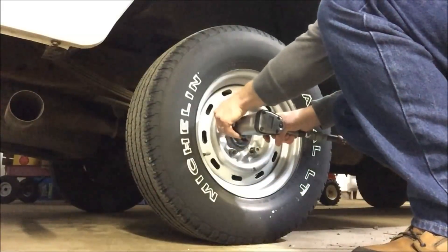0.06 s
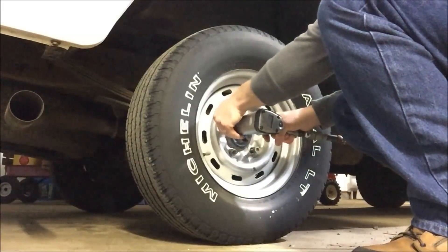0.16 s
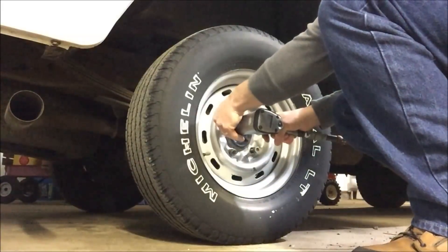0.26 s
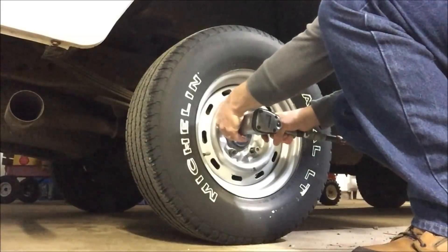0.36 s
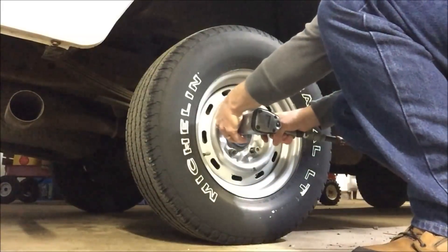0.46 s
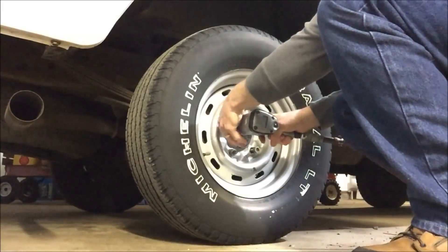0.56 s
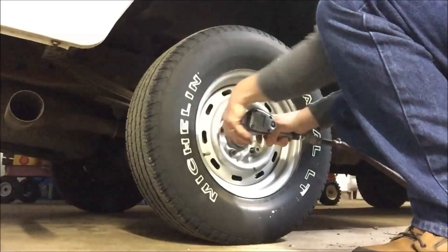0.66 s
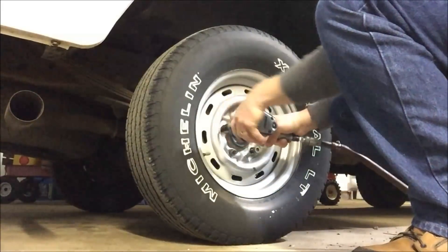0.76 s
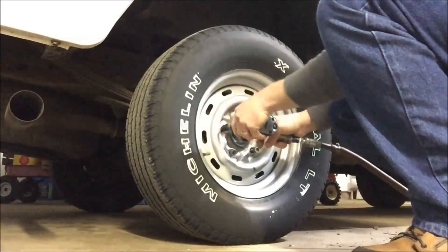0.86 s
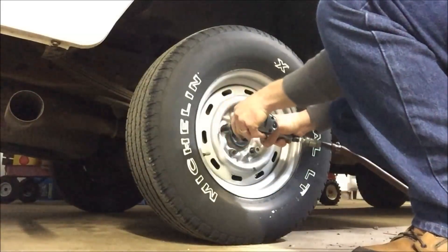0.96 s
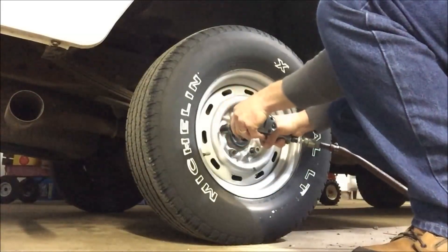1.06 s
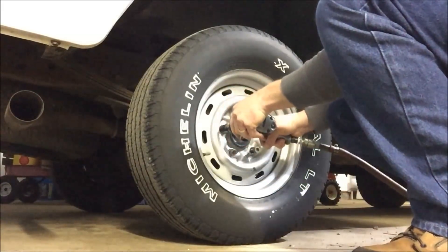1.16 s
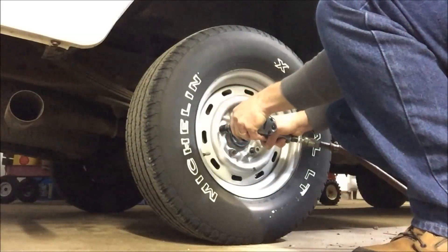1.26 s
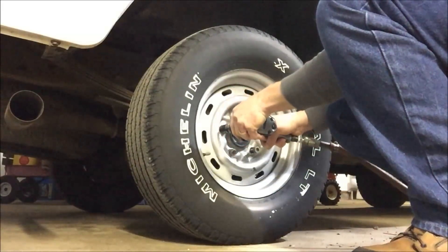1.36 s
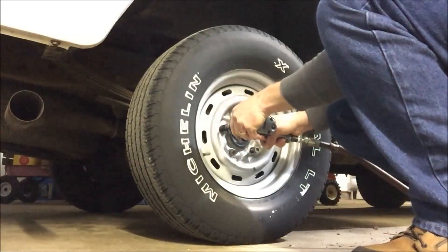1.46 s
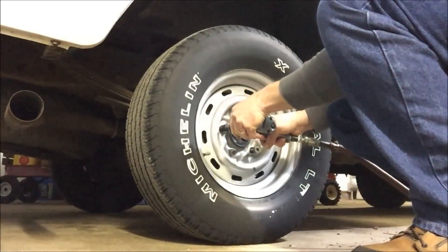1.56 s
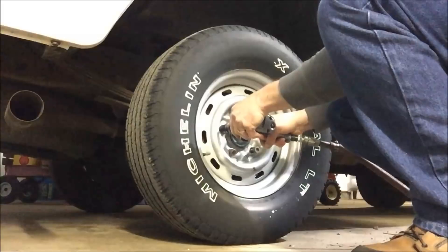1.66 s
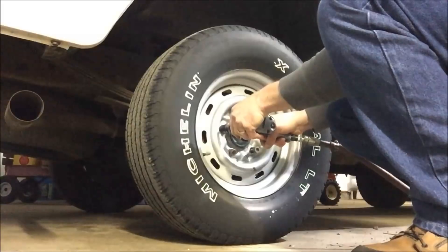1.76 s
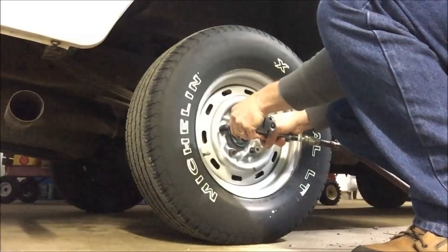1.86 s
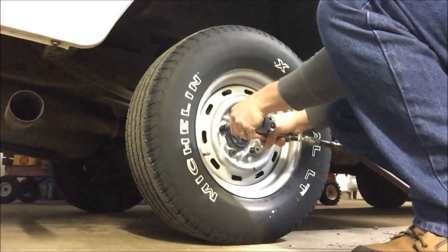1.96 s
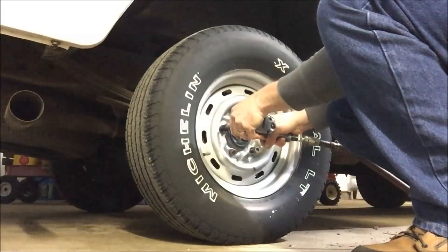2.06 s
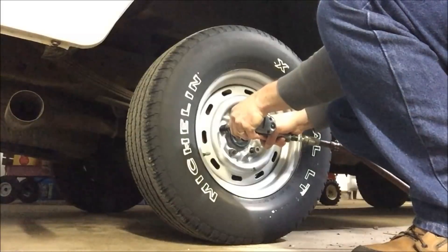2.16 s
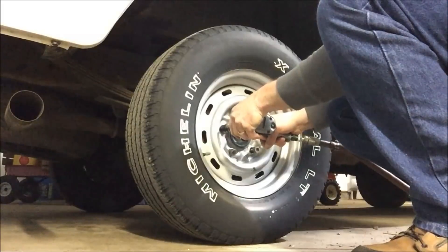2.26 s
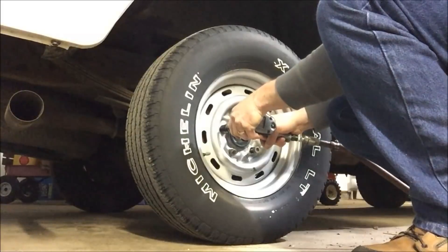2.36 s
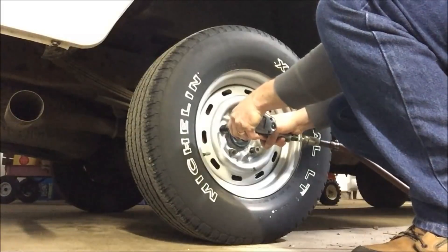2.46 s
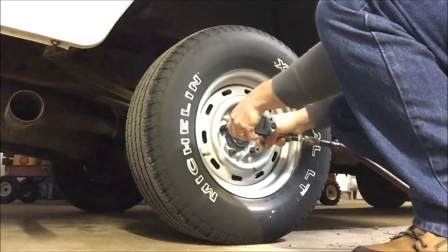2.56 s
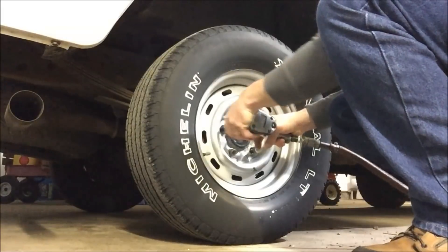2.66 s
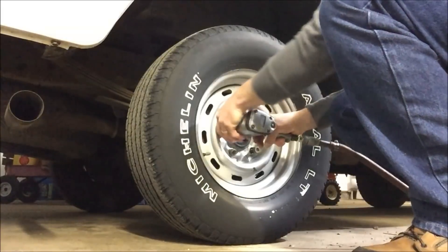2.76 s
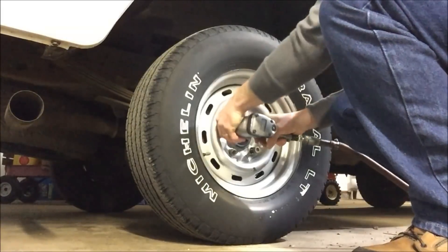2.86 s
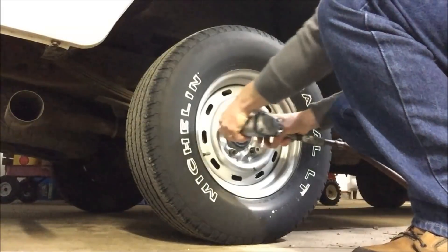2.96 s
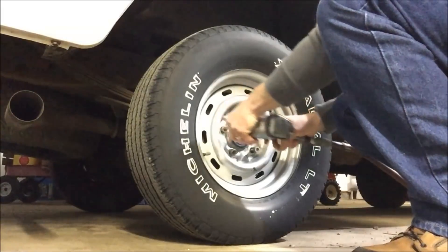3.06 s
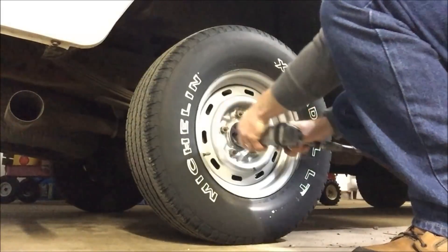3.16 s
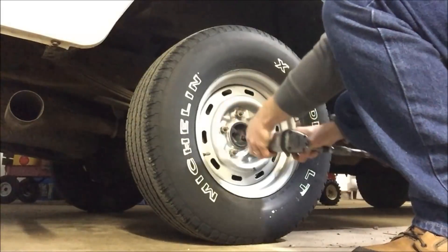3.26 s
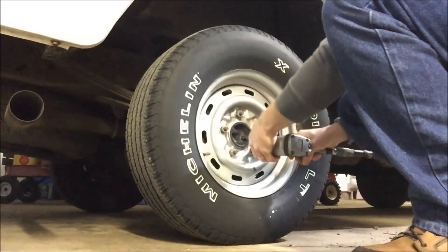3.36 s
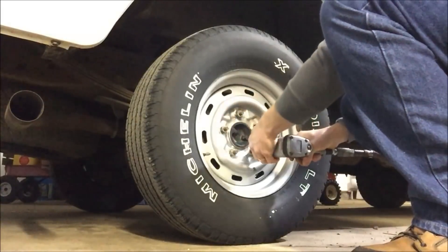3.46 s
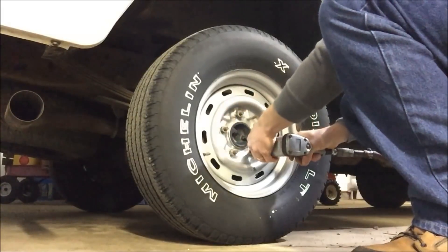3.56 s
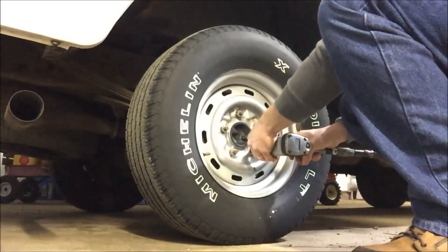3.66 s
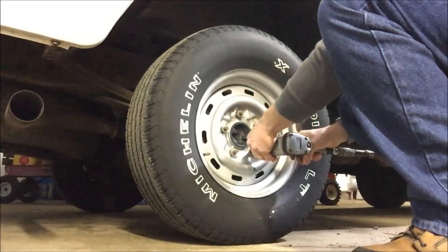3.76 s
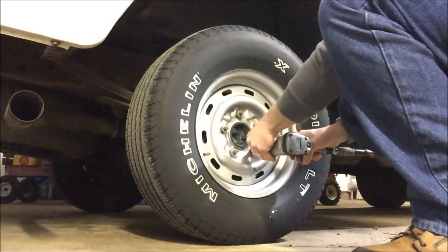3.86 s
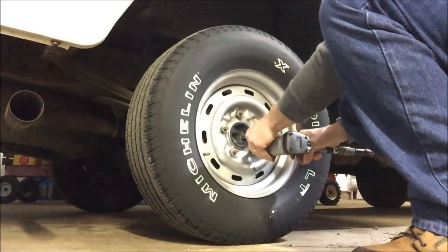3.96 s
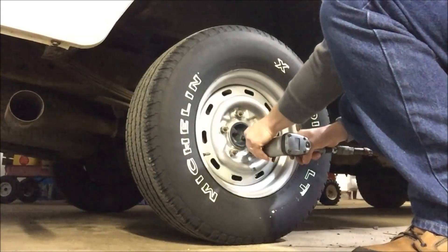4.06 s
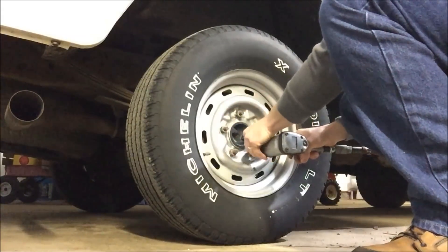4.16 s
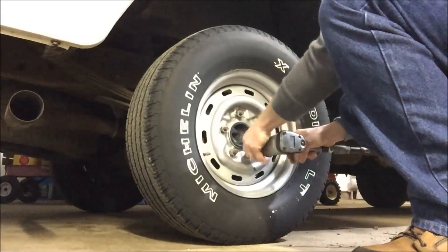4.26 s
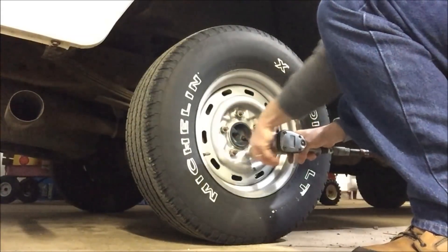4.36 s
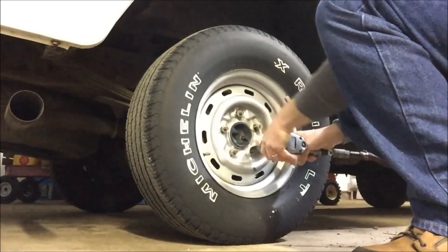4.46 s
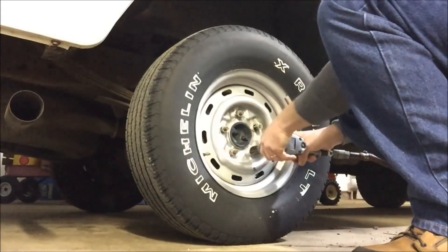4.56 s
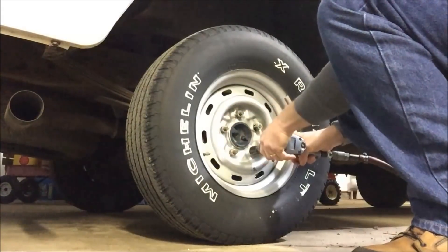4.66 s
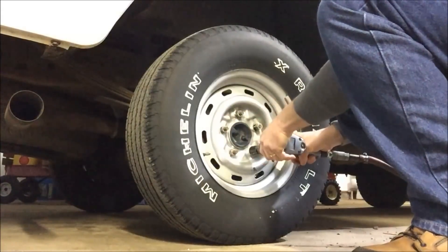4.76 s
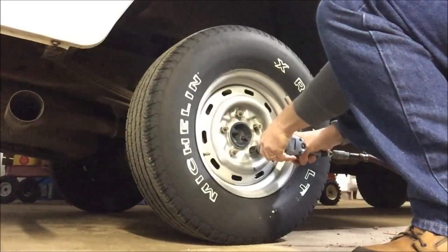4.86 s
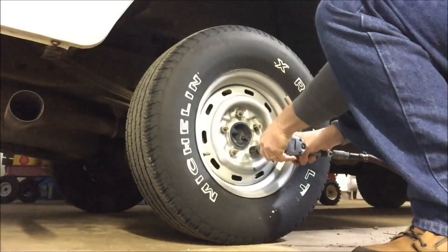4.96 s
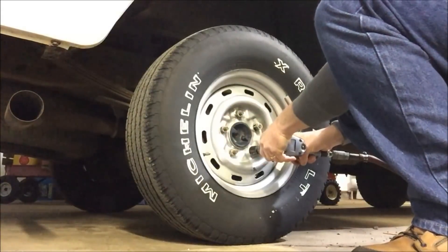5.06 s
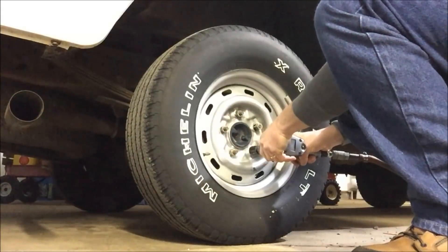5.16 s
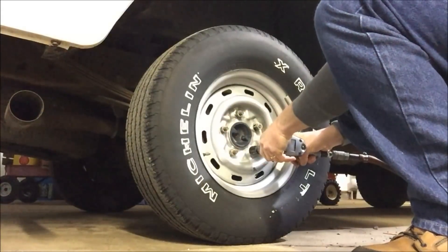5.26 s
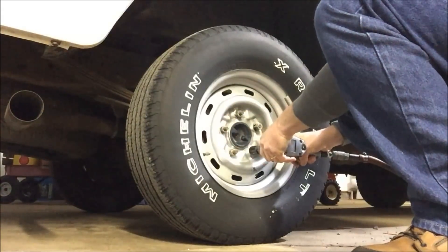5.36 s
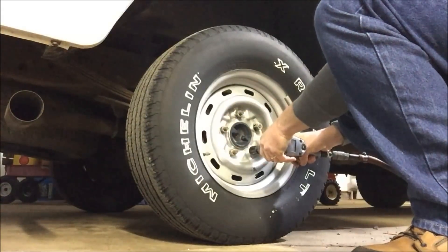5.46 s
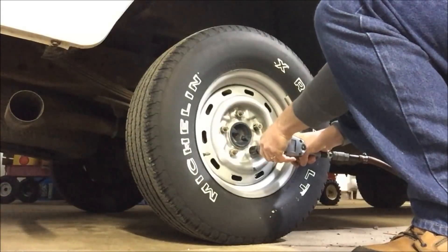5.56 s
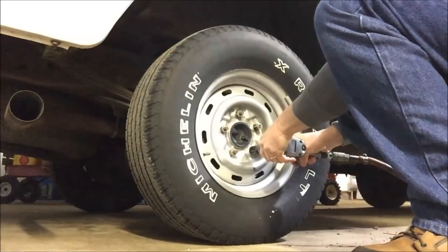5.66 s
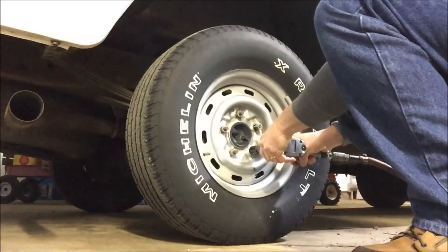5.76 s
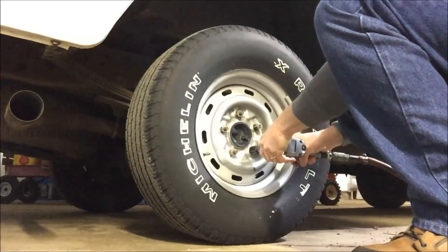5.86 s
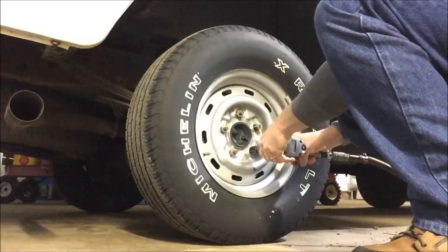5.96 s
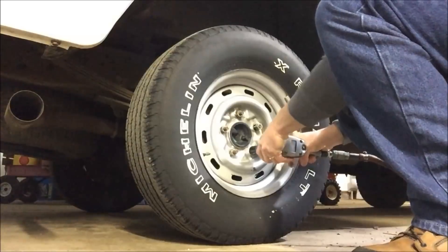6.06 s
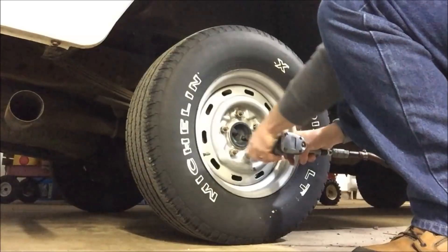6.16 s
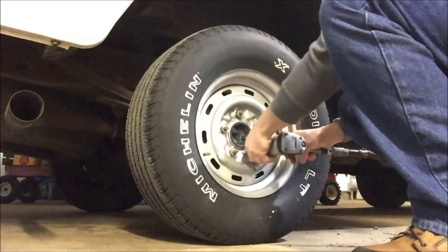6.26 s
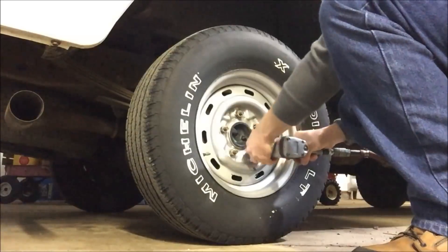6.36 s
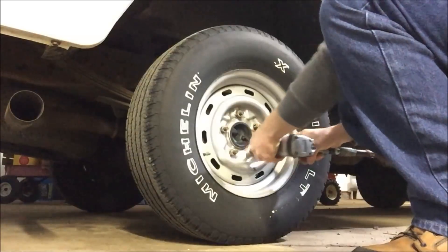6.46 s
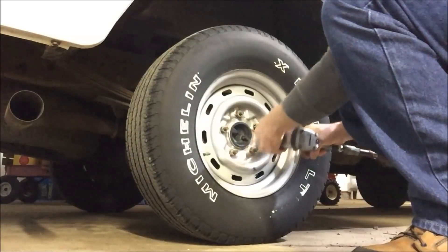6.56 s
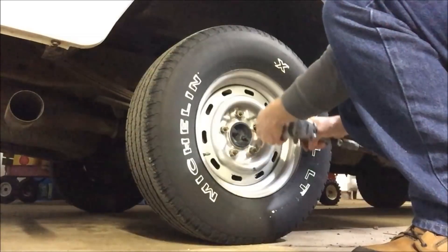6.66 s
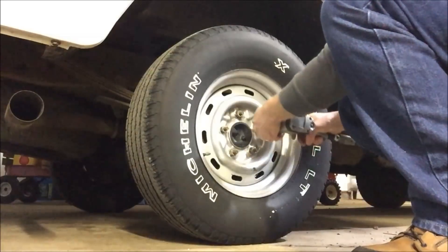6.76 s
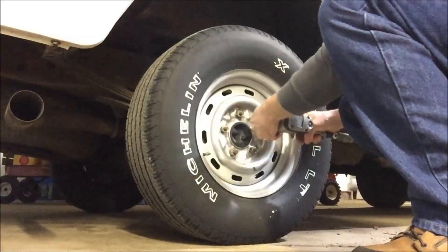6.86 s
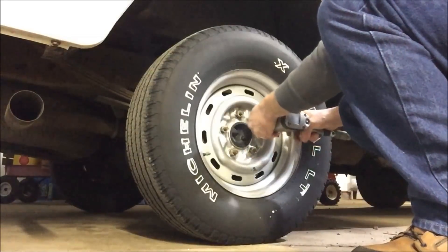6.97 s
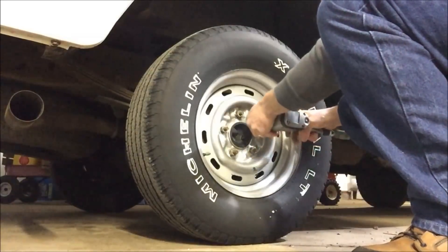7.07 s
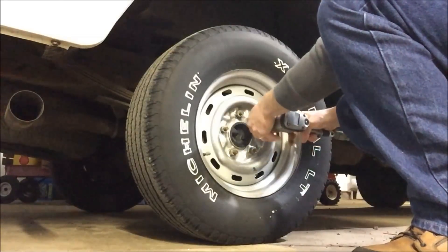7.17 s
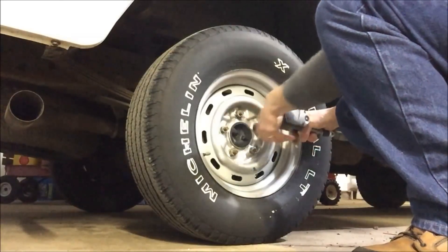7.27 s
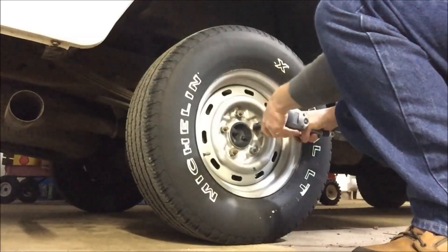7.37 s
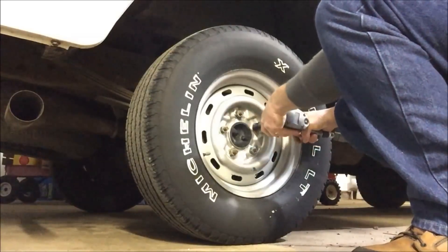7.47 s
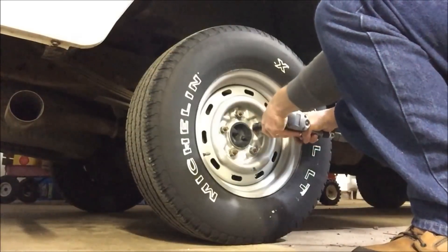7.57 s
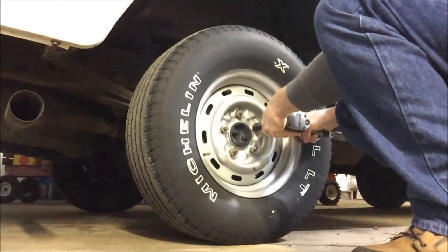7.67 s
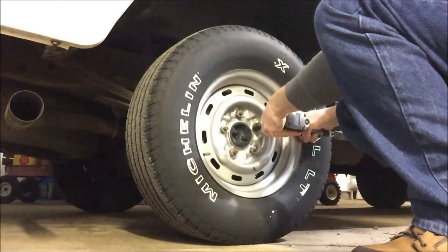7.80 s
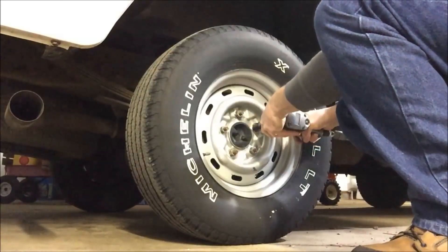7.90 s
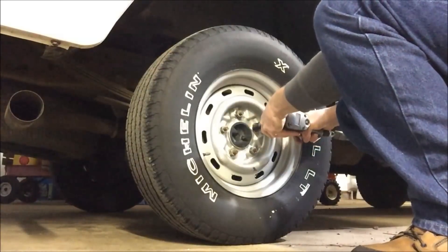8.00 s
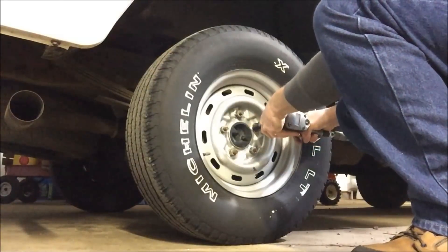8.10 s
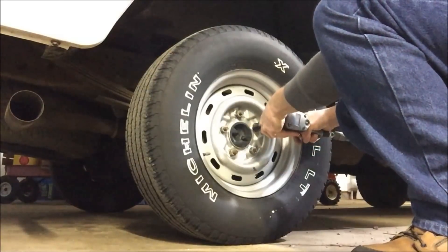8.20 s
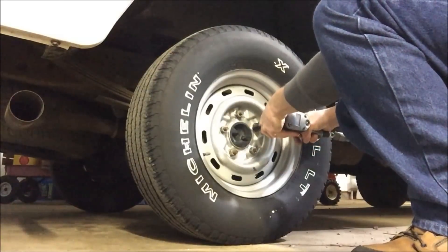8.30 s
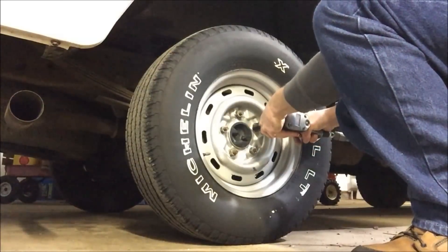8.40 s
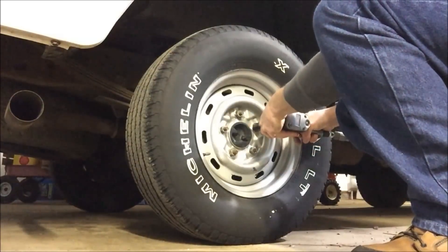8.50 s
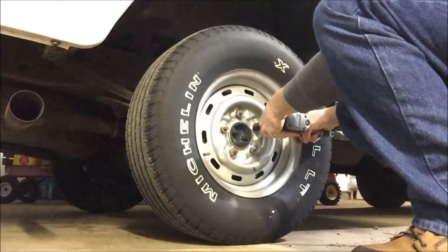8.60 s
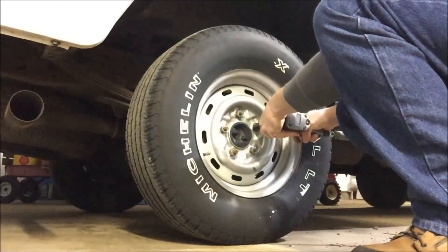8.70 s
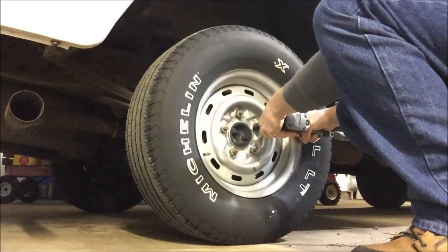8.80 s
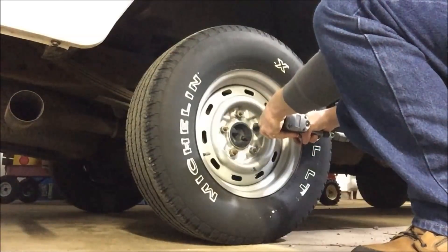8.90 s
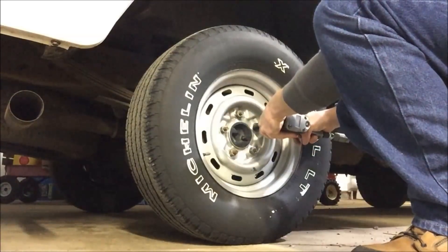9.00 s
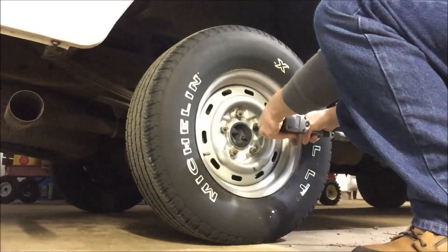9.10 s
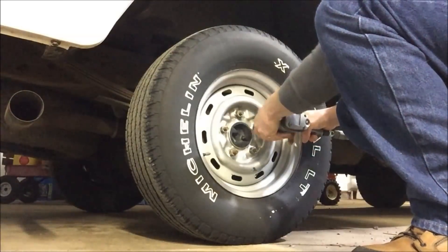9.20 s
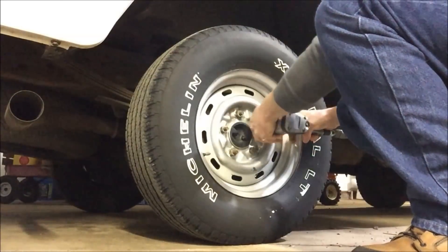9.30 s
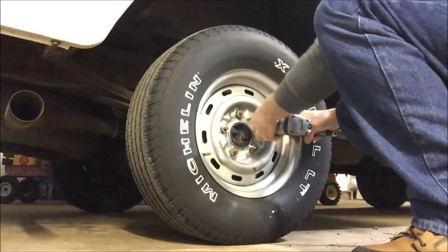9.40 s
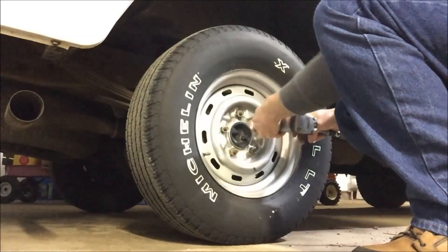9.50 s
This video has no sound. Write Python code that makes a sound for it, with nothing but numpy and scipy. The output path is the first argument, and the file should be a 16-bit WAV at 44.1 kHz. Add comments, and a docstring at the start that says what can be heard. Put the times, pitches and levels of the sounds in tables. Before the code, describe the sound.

Inside a large, echoing shed, close to the microphone, a metal socket clicks and knocks on a wheel nut. A pneumatic impact wrench bursts in with a loud air rush and rising whine, then hammers in heavy, separate blows amid hissing exhaust. It stops; the socket knocks onto another nut. Two more bursts follow with faster rattling that slows as each nut tightens, over low rumble.

```python
"""In a large shed, with a mono microphone close by, a socket clicks and knocks on nuts and wheel over a low rumble.
A trigger clicks and an air impact wrench bursts in: exhaust hiss, a rising vane whine and gusts on the microphone.
Then a hammer stalls the rotor blow by blow, each blow ringing the wheel while the exhaust hisses and puffs.
Three such bursts run, with more knocks between them; noise, decaying modes and vane pulses make the sources,
and the walls answer with quick reflections and a long tail."""
import sys
import numpy as np
from scipy import signal
from scipy.fft import rfft, irfft, next_fast_len
from scipy.io import wavfile
from scipy.ndimage import uniform_filter1d

SR = 44100
rng = np.random.default_rng(int(sys.argv[2]) if len(sys.argv) > 2 else 0)


def inscribe(sig):
    """Save sig as 16-bit PCM at rate SR to the path in sys.argv[1].

    A 1-D sig is mono; a 2-D sig holds one channel per row.
    Samples are clipped to [-1, 1] before scaling.
    """
    pcm = np.round(np.clip(np.atleast_2d(sig).T, -1, 1) * 32767)
    wavfile.write(sys.argv[1], SR, pcm.astype(np.int16))


N = 420713

# low rumble of the shed: (time [s], RMS level [dB])
RUMBLE_LEVEL = [(0, -60), (.58, -84), (.82, -41), (1.1, -59), (1.35, -38.5), (2.7, -40), (3.4, -45),
                (3.6, -46), (4.05, -59), (4.6, -53), (5.2, -40), (6.5, -44), (7.3, -49.5), (8.2, -38),
                (9.54, -53)]
# its spectrum: (frequency [Hz], relative level per Hz [dB])
RUMBLE_SPECTRUM = [(15, -34.5), (35, -20), (55, 9.5), (100, -1.5), (200, -1), (400, -23.5), (800, -45.5)]
# spectrum of the room noise: (frequency [Hz], relative level per Hz [dB])
ROOM_SPECTRUM = [(59, -42.5), (100, -7), (192, -7.5), (310, 0.5), (733, -27), (1020, -9.5), (2090, -15.5),
                 (6620, -25), (15000, -35.5)]
ROOM_DB = -61  # RMS
# faint far tone: (time [s], RMS level [dB])
FAR_TONE_LEVEL = [(0, -75), (3, -85.5), (3.3, -72), (4.3, -78), (6.3, -87.5), (6.6, -64), (7.4, -71),
                  (9.54, -92)]

# what wheel and socket ring with: (frequency [Hz], relative level [dB], t60 before added damping [s])
WHEEL_MODES = [(301, -4, .3), (1039, 0, .22), (1303, -10, .15), (1940, -12, .2), (2170, -10, .15),
               (2570, -10, .1), (3050, -15, .14), (3580, -14, .14), (3780, -16, .14), (4215, -14, .15),
               (5600, -16, .2), (6570, -17, .2), (8500, -22, .2)]
# socket knocks: (time [s], relative level [dB], weight on the wheel [dB], brightness [dB],
# decay constant of the contact [ms], ping frequency [Hz])
SOCKET_KNOCKS = [(0.07, -34, 6.5, -1, 8.7, 1190), (0.189, -40, 14.5, 1, 3, 1710),
                 (0.391, -23.5, -11.5, -6, 17, 3750), (0.471, -32, -10, 5, 6.5, 6400),
                 (0.675, -32.5, -5.5, 0, 2.9, 3500), (0.705, -42, -1.5, -5, 30, 2890),
                 (0.745, -16, 1, -11, 3, 1300), (0.754, -12, -5, -6, 12.3, 1265),
                 (0.899, -31.5, -9.5, 11.5, 3.9, 2090), (3.557, -43, 5, -6, 2.4, 3300),
                 (3.663, -18.5, -1.5, 4, 10.4, 2990), (3.669, -13, 19, -2.5, 1.6, 1195),
                 (3.857, -34, 7, 10.5, 3.6, 6400), (3.878, -36, 25.5, -25.5, 2.8, 1330),
                 (3.934, -41.5, 7.5, 26, 1.8, 1185), (4.035, -39, -6, 9, 2.9, 7180),
                 (4.067, -35.5, 0, -20, 7.2, 2840), (4.11, -35.5, 1.5, 18.5, 3.2, 6130),
                 (4.154, -23.5, -13.5, 2.5, 2.4, 2920), (4.161, -12.5, -6, 0, 11, 4570),
                 (4.235, -18.5, -1.5, -7.5, 11, 3450), (4.352, -15, 0, -14.5, 6.3, 1900),
                 (4.394, -22, -1, 0.5, 2.4, 9100), (4.426, -11.5, 6.5, -0.5, 4.3, 2730),
                 (6.545, -36, 5, 7, 4, 1700), (6.894, -14.5, -17, 4.5, 4.7, 3680),
                 (6.918, -21, 0, -2, 4.4, 3770), (7.001, -29, 2, -4, 3.4, 2930),
                 (7.109, -10, 5, 3, 3, 1330), (7.134, -8, 6, -2, 10, 3100),
                 (7.142, -6.5, 15.5, -20, 0.93, 3740)]
# trigger valve clicks just before the air of the first two bursts: same columns
TRIGGER_CLICKS = [(1.061, -28, -20, 9.7, 4.5, 7430), (4.637, -31.5, -12.5, 12, 3, 3640)]
# colour of a knock: (frequency [Hz], relative level [dB], share of the weight [1], share of the brightness [1])
KNOCK_SPECTRUM = [(300, -23.5, 1.07, 0.1), (1100, -20.5, 0.39, 0), (2620, -11, 0.14, 0),
                  (4500, -13.5, 0, 0.3), (9000, -17, 0, 0.9)]
PING_DB = -9

# pulls of the trigger: (opens [s], fully open after [s], nut seats [s], closes [s],
# surge level [dB], level as the nut seats [dB], working level before the sag [dB])
TRIGGER_PULLS = [(1.076, 0.022, 1.246, 2.78, -8.5, -20.5, -22.5),
                 (4.65, 0.013, 4.87, 6.219, -8, -23.5, -21.5),
                 (7.4325, 0.022, 7.665, 9.275, -7.5, -25, -21)]
SHUT_DB, OPEN_BEND = -29.5, 2.8  # flow at first opening, relative to the surge; curve of the opening
SURGE_BEND, RECOVER_S, SAG_DB_PER_S = 2.26, 0.18, -1.42  # curve of the surge's fall; settling; slow sag
CLOSE_S, BLEED_DB, BLEED_S = 0.011, -10, 0.046  # air left in the motor hisses out after the valve shuts

# spectrum of the jet hiss: (frequency [Hz], relative level per Hz [dB])
HISS_SPECTRUM = [(60, -48.5), (120, -20.5), (300, -1), (700, -10), (1100, -8), (1500, -7), (2500, -6.5),
                 (3100, 0.5), (4200, -2.5), (6600, -2.5), (9000, -5.5), (12000, -6), (15500, -9)]
# bell-shaped changes to the hiss: (frequency [Hz], width [Hz], level [dB])
HISS_DIPS = [(4794, 500, -5.5), (10340, 460, -6), (2230, 370, 0)]
# resonances of a puff in the exhaust port: (frequency [Hz], bandwidth [Hz], relative level [dB])
PORT_MODES = [(317.5, 151, 1.5), (184.8, 210, -27), (614, 635, 2.5), (1002, 78, -19)]

# free spin-up, one curve a burst: (time [s], vanes passing the port [Hz])
SPIN_UPS = [
    [(1.085, 90), (1.103, 157.4), (1.133, 285.2), (1.155, 357.4), (1.18, 470.4), (1.24, 580), (1.309, 660),
     (1.345, 683)],
    [(4.67, 98), (4.682, 162.8), (4.702, 246), (4.738, 380.5), (4.802, 504), (4.9, 610), (4.925, 620)],
    [(7.45, 97), (7.474, 212.2), (7.514, 346), (7.56, 483.3), (7.61, 561), (7.64, 565), (7.66, 460)],
]
# harmonics of the vane rate, one row a burst as the port points elsewhere:
# (1st, 2nd, 3rd, 4th: level over the air flow [dB])
WHINE_HARMONICS = [(0, -7, -14.5, -17), (0, -1.5, -7.5, -10.5), (0, -0.5, -8.5, -6)]
# what the whine passes through: (frequency [Hz], level [dB])
MUFFLER_RESPONSE = [(100, -9.5), (200, -7), (330, 4.5), (450, -2.5), (620, 1), (760, 0), (1100, 5.5),
                    (1400, 3), (1900, 3.5), (2600, -0.5)]

# gusts of exhaust air on the microphone: (time [s], relative level [dB], frequency [Hz])
AIR_GUSTS = [(1.089, -20.5, 114), (4.665, -9, 66.5), (5.027, -19, 75.6), (6.099, -37, 64.6),
             (7.442, -26, 38), (7.819, -25, 81.5), (8.022, -25, 79), (8.221, -22, 83), (8.47, -23, 108),
             (8.755, -31, 83.4), (8.839, -37, 72.68), (9.089, -30, 96.9), (9.177, -19, 73.98),
             (9.239, -29, 99.6)]

# hammer blows, one list a nut: (time [s], ...)
BLOW_TIMES = [
    [1.381, 1.45, 1.507, 1.578, 1.644, 1.705, 1.8, 1.889, 1.982, 2.07, 2.158, 2.246, 2.334, 2.42, 2.508,
     2.599, 2.69, 2.781],
    [4.961, 5.014, 5.064, 5.117, 5.162, 5.214, 5.259, 5.302, 5.361, 5.407, 5.467, 5.552, 5.638, 5.726,
     5.797, 5.885, 5.952, 6.018, 6.103, 6.192],
    [7.708, 7.76, 7.808, 7.86, 7.91, 7.96, 8.01, 8.061, 8.113, 8.162, 8.209, 8.254, 8.295, 8.34, 8.407,
     8.453, 8.521, 8.581, 8.657, 8.73, 8.796, 8.862, 8.934, 9.002, 9.078, 9.153, 9.228, 9.274],
]
# blows harden as the nut tightens, and the rotor's run-up follows the wait since the last blow:
# (first blow [dB], tight blow [dB], hardening time constant [s], run-up after a 50 ms wait [ms],
# change of run-up per wait [ms/ms])
BLOW_STROKES = [(-15.5, -15, .3, 33, -.2), (-20, -19.5, 0.73, 33.5, .15), (-25, -15.5, 0.056, 33, .17)]
BLOW_SPREAD_DB, RUN_UP_SPREAD_MS = 1, 1.5
# how the hammer lands on each nut: (row holds until [s], crack level [dB], rise of the ring [ms],
# rotor runs on [ms], ring level [dB], puff thud below 500 Hz [dB], thud from 500 Hz up [dB],
# as the port turns away from or toward the microphone, rotor locked after the blow [ms],
# extra thud of slow puffs [1], flare of the hiss [dB], deep ring of the wheel [dB])
NUT_SETTINGS = [(3, 1, .5, 1, 0, 4, -3, 20, .42, 7.5, 0), (7, -5, 6, 5, 4.5, -7, 1, 12, 2.6, 4, -9),
                (10, -5, 6, 5, 4.5, -9, 3, 12, 2.6, 4, -9)]
# after a long wait the hammer bounces and taps again before the next blow
BOUNCE_S, BOUNCE_DB, LONG_WAIT_S = .041, -8.5, .08

# reverberation of the shed: (frequency [Hz], t60 [s])
SHED_T60 = [(60, 0.63), (300, 0.94), (1000, 1.07), (3000, 0.99), (8000, 0.7), (15000, 0.11)]
EDGE_HZ = 15750  # upper band limit


def amp(db):
    """Level in dB to amplitude."""
    return 10 ** (np.asarray(db) / 20)


def evened(x):
    """Scales x to an RMS of one."""
    return x / np.sqrt(np.mean(x ** 2) + 1e-20)


def wander(count, width):
    """Random drift of unit RMS, smoothed over width samples."""
    return evened(uniform_filter1d(rng.standard_normal(count), width))


def swell(t, peak_s):
    """A quick rise to one at peak_s, then a slower decay."""
    return np.exp(1) * t / peak_s * np.exp(-t / peak_s)


def read(points, hz):
    """Reads a curve at hz along a logarithmic frequency axis."""
    f, value = np.transpose(points)
    return np.interp(np.log(hz + 1), np.log(f + 1), value)


def add(mix, s, sound):
    """Lays a sound into the mix at s seconds."""
    part = mix[round(s * SR):][:len(sound)]
    part += sound[:len(part)]


def coloured(x, points, dips=()):
    """Shapes x by a spectrum with optional bell-shaped dips."""
    size = next_fast_len(len(x))
    hz = np.fft.rfftfreq(size, 1 / SR)
    db = read(points, hz) + sum(d * np.exp(-((hz - f) / w) ** 2) for f, w, d in dips)
    return irfft(rfft(x, size) * amp(db), size)[:len(x)]


def background():
    """Lumpy rumble, faint room noise and a thin far tone."""
    t = np.arange(N) / SR
    rumble_level = amp(np.interp(t, *np.transpose(RUMBLE_LEVEL)))
    rumble = evened(coloured(rng.standard_normal(N), RUMBLE_SPECTRUM)) * rumble_level
    air = amp(ROOM_DB) * evened(coloured(rng.standard_normal(N), ROOM_SPECTRUM))
    tone_level = amp(np.interp(t, *np.transpose(FAR_TONE_LEVEL)))
    tone = np.sqrt(2) * tone_level * np.sin(2 * np.pi * 856 * t)
    return rumble + air + tone


def ring(colour, damping, spread_db):
    """The wheel's modes decay together, weighted by the blow's colour and shortened by damping."""
    t, out = np.arange(16000) / SR, 0
    chance = rng.standard_normal((len(WHEEL_MODES), 2))
    for (hz, db, t60), (level_chance, pitch_chance) in zip(WHEEL_MODES, chance):
        level_db = db + read(colour, hz) + spread_db * level_chance
        decay_db = -60 * t * damping / t60
        mode_hz = hz * (1 + 0.0069 * pitch_chance)
        out = out + amp(level_db + decay_db) * np.sin(2 * np.pi * mode_hz * t)
    return out


def knocks():
    """A short gritty contact and a ping of the socket, then the wheel rings, damped by the hand."""
    out, t = np.zeros(N), np.arange(3000) / SR
    ring_rise = np.minimum(np.arange(16000) / 120, 1)
    for s, db, weight_db, bright_db, ms, ping_hz in SOCKET_KNOCKS + TRIGGER_CLICKS:
        colour = [(hz, d + low * weight_db + high * bright_db) for hz, d, low, high in KNOCK_SPECTRUM]
        # falls 10 dB a decade relative to the colour, with steep outer ends
        per_hz = [(hz, d - 10 * np.log10(hz / 1000)) for hz, d in colour]
        per_hz = [(60, colour[0][1] - 20)] + per_hz + [(16000, colour[-1][1] - 26)]
        grit = amp(2.1 * wander(len(t), 40))
        waver = amp(3.5 * wander(16000, 300))  # the ring wavers at random in level, making it rougher
        contact = coloured(rng.standard_normal(len(t)) * grit, per_hz) * np.exp(-t * 1000 / max(ms, .5))
        ping = np.sin(2 * np.pi * ping_hz * t) * swell(t, .002)
        wheel = ring(colour, damping=1.16, spread_db=4.0) * ring_rise * waver
        add(out, s, amp(db + 18.0) * contact * np.minimum(t / 0.0033, 1) ** 2)
        add(out, s, amp(db + PING_DB) * ping)
        add(out, s, amp(db - 2.0) * wheel)
    return out


def air_flow():
    """Air surges when the valve opens, falls while the rotor runs free, settles under load and slowly sags."""
    t, flow = np.arange(N) / SR, np.zeros(N)
    for opens, rise, seats, closes, surge_db, seat_db, work_db in TRIGGER_PULLS:
        free = np.clip((t - opens - rise) / (seats - opens - rise), 0, 1)
        loaded = np.maximum(t - seats, 0)
        db = surge_db + (seat_db - surge_db) * free ** SURGE_BEND
        db += SHUT_DB * np.clip(1 - (t - opens) / rise, 0, 1) ** OPEN_BEND
        db += (work_db - seat_db) * (1 - np.exp(-loaded / RECOVER_S)) + SAG_DB_PER_S * loaded
        valve = np.clip((closes - t) / CLOSE_S, 0, 1)
        bleed = amp(BLEED_DB) * np.exp(-np.maximum(t - closes, 0) / BLEED_S)
        flow += amp(db) * (t > opens) * np.maximum(valve, bleed)
    return flow


def nut(s):
    """The settings, after the end time, for the nut being tightened at time s."""
    ends, *rest = np.transpose(NUT_SETTINGS)
    return [column[np.searchsorted(ends, s)] for column in rest]


def blows():
    """Time [s], strength [dB] and rotor run-up [ms] of every blow, the last two with a random spread."""
    rows = []
    for s, stroke in zip(map(np.array, BLOW_TIMES), BLOW_STROKES):
        first_db, tight_db, harden_s, run_ms, per_wait = stroke
        wait_ms = 1000 * np.diff(s, prepend=s[0] - .05)
        strength_db = tight_db + (first_db - tight_db) * np.exp(-(s - s[0]) / harden_s)
        rows.append([s, strength_db, run_ms + per_wait * (wait_ms - 50)])
    rows = np.hstack(rows).T
    return rows + rng.standard_normal(rows.shape) * [0, BLOW_SPREAD_DB, RUN_UP_SPREAD_MS]


def vane_puffs(rebound_db=-1, fast_hz=130):
    """After a blow the rotor rebounds, stops and speeds up evenly; each vane passing the port lets out a puff."""
    spin_rate, first_turn = 7200, .43  # vanes per s^2, vane pitches
    t = np.arange(N) / SR
    locked_s = nut(t)[6] / 1000
    s, _, lead_ms = blows().T
    run_on_ms = nut(s)[2]
    s, lead_ms = s + run_on_ms / 1000, lead_ms + run_on_ms
    coming = np.minimum(np.searchsorted(s, t), len(s) - 1)
    # the first blow of a burst has none before it, so its run-up counts from 60 ms ahead
    last = np.where(np.diff(s, prepend=0) < .15, np.roll(s, 1), s - .06)[coming]
    since_stop = t - (s - lead_ms / 1000)[coming] + np.sqrt(2 * first_turn / spin_rate)
    vane = np.floor(spin_rate / 2 * since_stop ** 2 + 1 - first_turn)
    passing = (np.diff(vane, prepend=0) != 0) & (t > last + locked_s) & (t < s[coming])
    speed = spin_rate * abs(since_stop) / fast_hz
    puffs = passing * amp(rebound_db * (since_stop < 0) + rng.standard_normal(N))
    return puffs, puffs / (1 + speed ** 2)  # slow vanes hold more air and hiss harder


def exhaust(thud_db=4):
    """Jet hiss that flares with every puff, and the low thud of each puff in the port."""
    flow, t = air_flow(), np.arange(2000) / SR
    puffs, charged = vane_puffs()
    flare = signal.oaconvolve(charged, swell(t, .0016))[:N]
    flutter = amp(2.04 * wander(N, 150))
    jet = evened(coloured(rng.standard_normal(N), HISS_SPECTRUM, HISS_DIPS))
    low_db, high_db, _, slow, flare_db, _ = nut(np.arange(N) / SR)[4:]
    hiss = amp(4.0) * jet * flow * flutter * (1 + amp(flare_db) * flare)
    kicks = (puffs + slow * charged) * flow
    port = np.zeros(N)
    for hz, width_hz, db in PORT_MODES:
        resonance = np.exp(-np.pi * width_hz * t) * np.sin(2 * np.pi * hz * t)
        turned_db = low_db if hz < 500 else high_db
        port += signal.oaconvolve(kicks * amp(db + turned_db), resonance)[:N]
    thuds = signal.lfilter(*signal.butter(2, 110, "high", fs=SR), port)
    return hiss + amp(thud_db) * thuds


def whine():
    """Harmonics of the vane rate while the rotor runs free; turbulence makes each one waver."""
    out, flow = np.zeros(N), air_flow()
    for (s, speed_hz), harmonics in zip(map(np.transpose, SPIN_UPS), WHINE_HARMONICS):
        t = np.arange(s[0], s[-1], 1 / SR)
        hz = np.interp(t, s, speed_hz)
        level = flow[round(s[0] * SR):][:len(t)]
        fade = np.clip(np.minimum(t - s[0], s[-1] - t) / .0033, 0, 1)
        turns = np.cumsum(hz * (1 + 0.017 * wander(len(hz), 200))) / SR
        for k, db in enumerate(harmonics, 1):
            waver_db = k * wander(len(hz), 600)
            tone_db = db + read(MUFFLER_RESPONSE, k * hz) + waver_db
            add(out, s[0], fade * level * amp(tone_db) * np.cos(2 * np.pi * k * turns))
    return out


def gusts():
    """Each gust pushes the microphone's diaphragm through a few slow, dying swings."""
    out, t = np.zeros(N), np.arange(8000) / SR
    for s, db, hz in AIR_GUSTS:
        push = np.exp(1) * t / 0.0071 * np.exp(-t / 0.0074)
        add(out, s, amp(db) * push * np.sin(2 * np.pi * hz * t))
    return out


def hammer():
    """Each blow cracks on the anvil and rings the wheel, damped by the nut."""
    out, t = np.zeros(N), np.arange(16000) / SR
    # both spectra: (frequency [Hz], relative level [dB])
    ring_colour = [(1000, 4), (1400, 8.8), (3000, 0.88), (9000, 7.5)]
    crack_colour = [(400, -20), (900, 7), (1500, -3.0), (3500, 5.5), (6000, 0.0), (12000, -7.0)]
    crack_shape = np.minimum(t[:1500] / 0.0039, 1) * np.exp(-t[:1500] / 0.014)
    hits = blows()[:, :2]
    wait = np.diff(hits[:, 0], append=N)
    # waits over a second are pauses between bursts
    bounces = hits[(wait > LONG_WAIT_S) & (wait < 1)] + [BOUNCE_S, BOUNCE_DB]
    for s, db in np.vstack([hits, bounces]):
        crack_db, rise_ms, _, ring_db, *_, deep_db = nut(s)
        rise = np.minimum(t * 1000 / rise_ms, 1) ** 2
        wheel = ring([(300, deep_db)] + ring_colour, damping=4.8, spread_db=1)
        # the ring starts early by two thirds of its rise
        add(out, s - rise_ms / 1500, amp(db + ring_db) * rise * wheel)
        crack = coloured(rng.standard_normal(1500), crack_colour)
        add(out, s, amp(db + crack_db + 3) * crack * crack_shape)
    return out


def shed(x, late_db=-14):
    """Quick reflections from vehicle and floor, then the long tail; three random sets of echoes fade in turn."""
    out, size = x.copy(), 2 * SR
    for k in range(3):
        # sparse echoes of random sign, one in every 20 samples
        taps = np.zeros(size)
        taps[np.arange(200, size - 20, 20) + rng.integers(0, 20, (size - 201) // 20)] = 1
        taps *= rng.choice([-1., 1.], size)
        hz, t, z = signal.stft(taps, SR, nperseg=512)
        decay = amp(-60 * t / read(SHED_T60, hz)[:, None])
        late = signal.istft(z * decay, SR, nperseg=512)[1][:size]
        early = taps * amp(-60 * np.arange(size) / SR / .15)
        tail = amp(-17.5) * early / np.linalg.norm(early) + amp(late_db) * late / np.linalg.norm(late)
        # each set fades in and out in turn, on a one-second cycle that also flips its sign
        share = np.sqrt(2 / 3) * np.cos(np.pi * (2 * np.arange(N) / SR + k / 3))
        out += signal.fftconvolve(x * share, tail)[:N]
    return out


def scene():
    """Sources in the shed, with the gusts and background straight at the microphone, on two equal channels."""
    tone = whine()  # beams at the microphone, so less of it reaches the walls
    in_shed = shed(exhaust() + tone / 2 + hammer() + knocks())
    mono = in_shed + tone / 2 + gusts() + background()
    return np.array([mono, mono])


def record(dry):
    """The loudest peaks overload the input; then the band limit."""
    clipped = dry / (1 + abs(dry / .92) ** 6) ** (1 / 6)
    low_pass = signal.firwin(511, EDGE_HZ, window=("kaiser", 9), fs=SR)
    return signal.oaconvolve(clipped, low_pass[None], "same")


dry = scene()
out = record(dry)
inscribe(out)
```